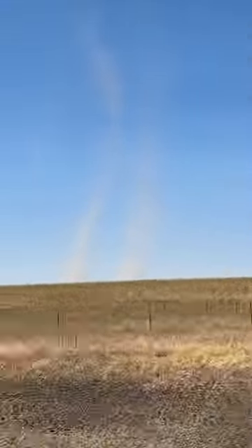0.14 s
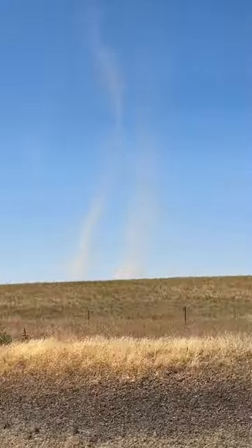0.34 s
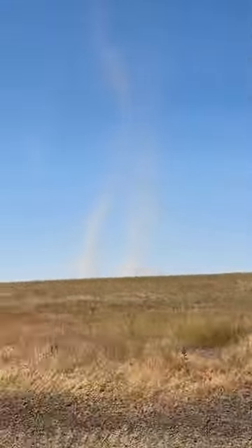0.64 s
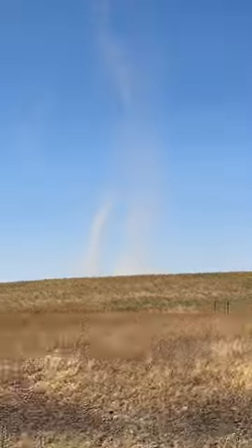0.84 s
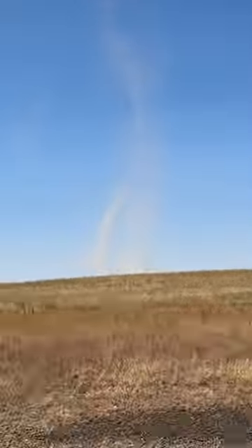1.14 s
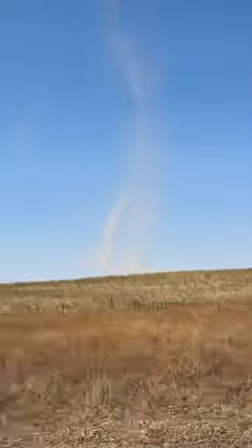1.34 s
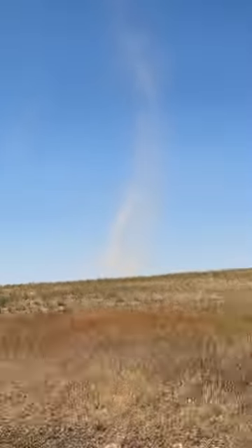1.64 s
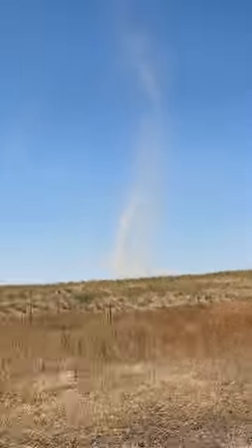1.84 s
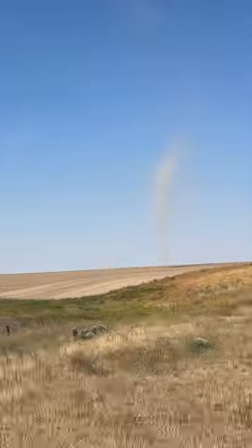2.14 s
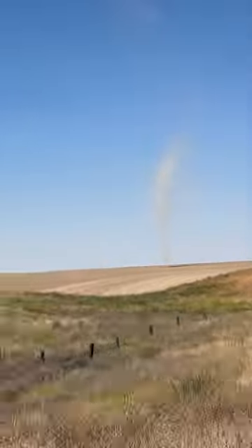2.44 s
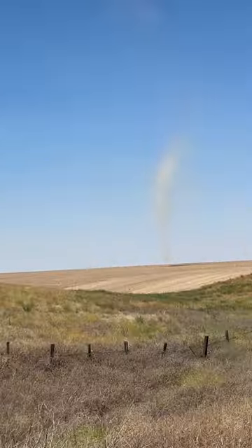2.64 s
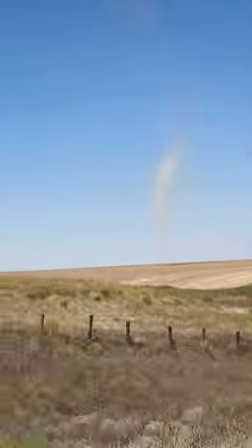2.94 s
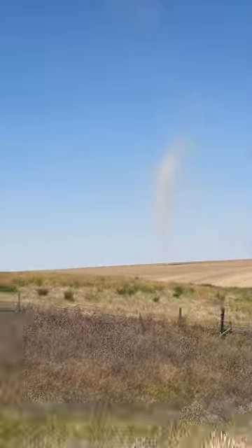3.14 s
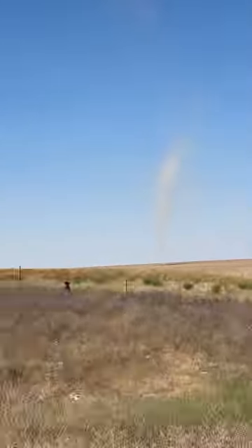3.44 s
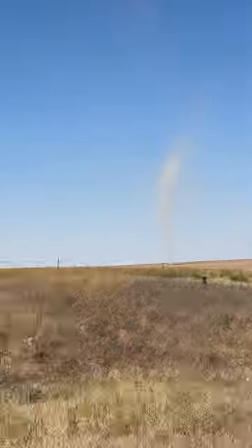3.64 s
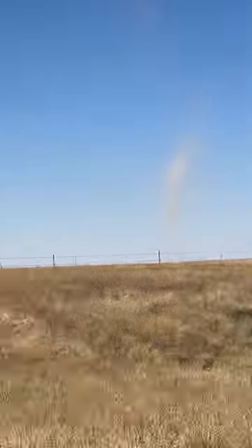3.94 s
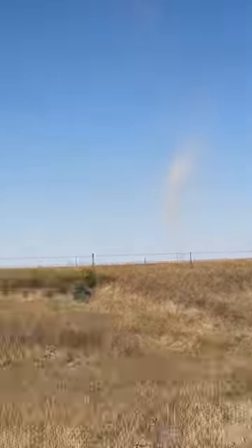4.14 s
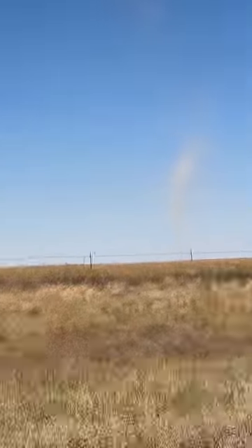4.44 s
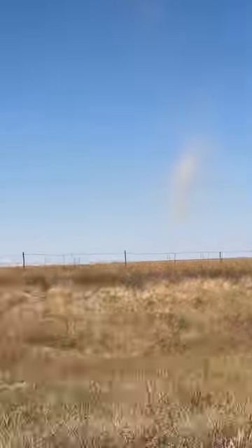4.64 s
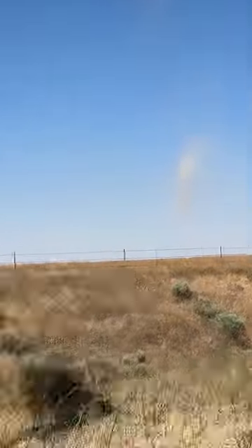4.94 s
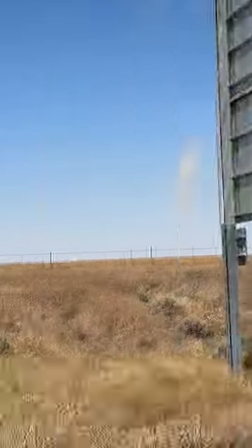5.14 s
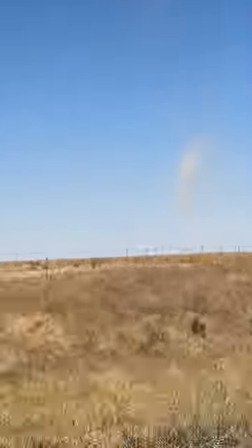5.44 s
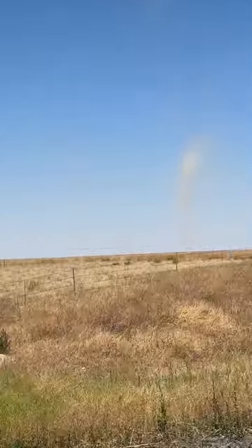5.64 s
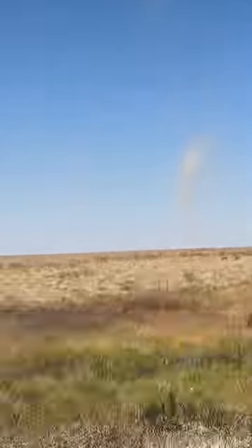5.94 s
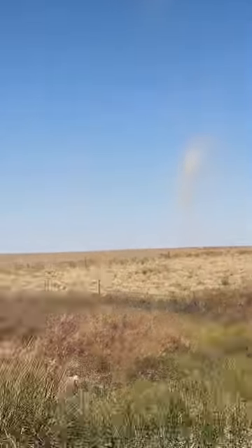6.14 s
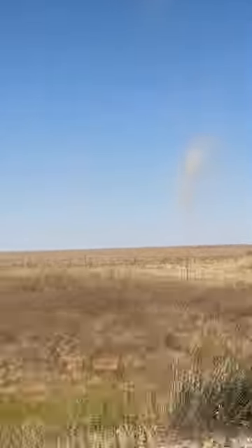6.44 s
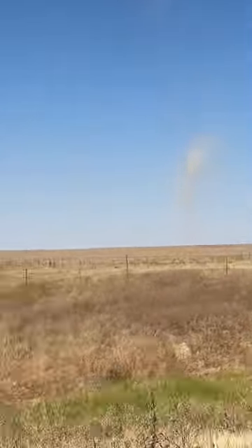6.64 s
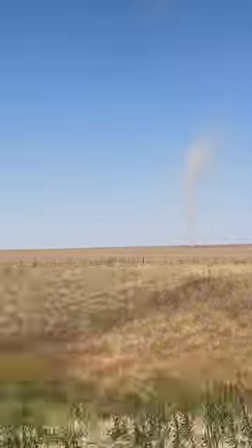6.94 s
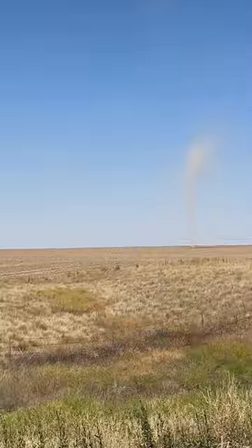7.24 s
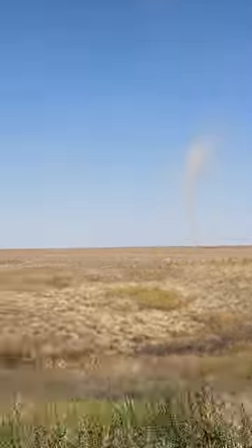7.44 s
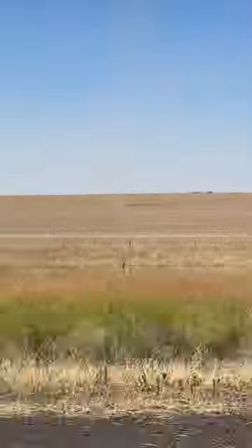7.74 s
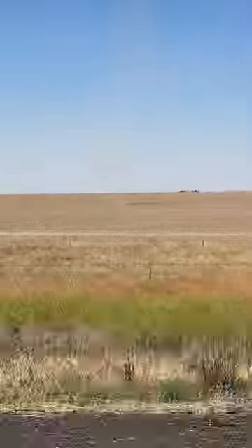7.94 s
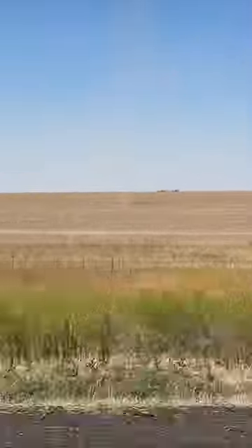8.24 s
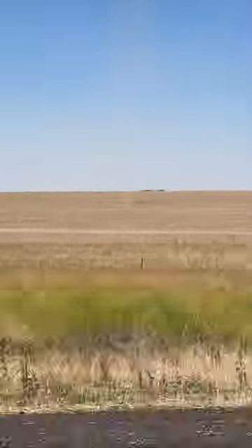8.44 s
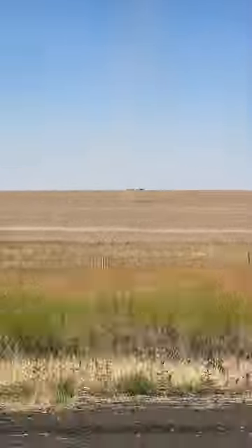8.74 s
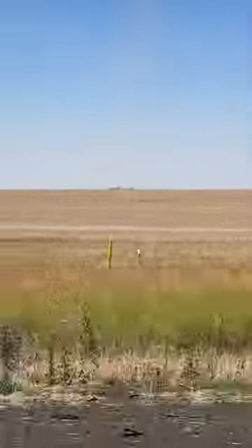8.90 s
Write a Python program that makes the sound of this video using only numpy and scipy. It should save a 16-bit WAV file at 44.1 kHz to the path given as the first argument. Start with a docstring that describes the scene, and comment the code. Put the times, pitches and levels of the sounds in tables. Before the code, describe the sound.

A phone at the open window of a moving car catches heavy wind buffeting in stereo. Deep booms throb around a low cabin tone and tyre rumble, with uneven thuds and small crackles. After two seconds the air rush abruptly becomes brighter and hissier, with thin treble spits; later it cuts back duller, and the hardest crack comes near the end, followed by a brief dip.

```python
"""At the open window of a car on a country road, with a phone held in the draught as microphone.
Road rumble and a wavering cabin tone lie under wind noise that booms in the cabin.
Shaped noise flutters on the microphone; thuds are falling tones, sharp cracks and clicks are jolts.
The filtered-noise rush of air cuts to a brighter, hissing one for some five seconds, then to a duller one.
Thin treble spits stand in the hiss, the first a click at the cut; the level dips after the hardest crack."""
import sys
import numpy as np
from scipy.fft import rfft, irfft, next_fast_len
from scipy.io import wavfile
from scipy.ndimage import uniform_filter1d, map_coordinates

SR = 44100
rng = np.random.default_rng(int(sys.argv[2]) if len(sys.argv) > 2 else 0)


def transcribe(signal):
    """Save signal, clipped to [-1, 1], as a 16-bit WAV file at the path in sys.argv[1]."""
    frames = np.atleast_2d(signal).T
    limited = np.clip(frames, -1, 1)
    pcm = np.round(limited * 32767).astype(np.int16)
    wavfile.write(sys.argv[1], SR, pcm)


N = 399987

# Levels in the tables and settings are relative: most layers add a small trim of their own.
# Spectra give only a shape. Lengths of gusts, flares and lulls are full widths at 1/e of the peak.

# tyre rumble through the body: columns f/Hz, spectral level/dB
ROAD_SPECTRUM = [(15, -51), (30, -14), (55, 8), (110, -15), (220, -9.5), (450, -15.5), (900, -18),
                 (2000, -100.5), (8000, -120)]
# low tone standing in the cabin: columns t/s, mean f/Hz, level/dB
DRONE_COURSE = [(0, 56.1, -30.5), (1.1, 63.04, -22), (2.0, 63.3, -29.5), (2.6, 58.92, -22.5),
                (3.7, 58, -21.5), (4.4, 59.74, -28), (7.2, 57.94, -26), (8.2, 59.92, -20.5),
                (9.0, 59.46, -23)]
# cabin air swinging at the window: columns f/Hz, spectral level/dB
BOOM_SPECTRUM = [(12, -34.5), (22, -26.5), (30, -9), (40, -2), (50, 0.5), (59, 2), (68, -2), (82, -2.5),
                 (110, -14), (160, -25), (400, -66.5), (2000, -120)]
# gusts through the window: columns peak t/s, length/s, cabin boom level/dB, eddy flutter level/dB
WINDOW_GUSTS = [(0.324, .04, -11.5, -27), (0.383, 0.15, -15.5, -34), (0.722, 0.042, -6.5, -30),
                (0.848, 0.14, -16.5, -41), (1.038, .11, -17.5, -24.5), (1.206, 0.12, -12.5, -44),
                (1.382, 0.083, -16, -34), (1.54, 0.03, -13.5, -32), (1.606, 0.035, -7.5, -33),
                (1.813, 0.26, -27, -29), (2.18, 0.04, -8.5, -27), (2.243, 0.04, -7, -28),
                (2.365, 0.045, -7, -29), (2.543, 0.039, -8.5, -27), (2.668, 0.088, -11, -43),
                (2.737, 0.039, -10, -23), (3.014, 0.21, -13, -25), (3.089, 0.082, -13, -16.5),
                (3.306, 0.04, -22.5, -28), (3.381, 0.05, -15.5, -26), (3.522, 0.1, -14.5, -23),
                (3.617, 0.08, -9.5, -19), (3.82, 0.12, -23, -20.5), (3.901, 0.11, -7, -20),
                (4.264, 0.091, -13.5, -43), (4.466, 0.11, -15.5, -42), (4.64, 0.048, -15.5, -19.5),
                (4.743, 0.11, -20, -24), (5.187, 0.088, -11.5, -21), (5.325, 0.25, -26, -26),
                (5.494, 0.1, -13, -23), (5.61, 0.032, -11, -23.5), (5.808, 0.04, -13.5, -35),
                (5.89, 0.07, -15, -30), (5.991, 0.07, -17, -28), (6.14, 0.18, -16.5, -21.5),
                (6.392, 0.39, -16, -24.5), (6.557, 0.06, -7.5, -21), (6.668, .03, -13.5, -24),
                (6.787, .14, -17, -31), (6.916, 0.091, -8, -34), (7.257, 0.28, -15, -27),
                (7.484, 0.19, -21, -40), (7.953, 0.12, -12, -21.5), (8.067, 0.035, -8, -23),
                (8.192, 0.13, -11, -33), (8.509, 0.19, -12, -20.5), (8.94, .15, -8.5, -19)]
# lulls in which the draught lets go of cabin and microphone: columns deepest t/s, length/s, depth/dB
DRAUGHT_LULLS = [(0.14, 0.14, -2), (0.655, 0.067, -7.5), (0.936, 0.054, -5.5), (1.49, 0.054, -8),
                 (2.083, 0.051, -4), (2.32, .03, -6), (2.47, .05, -4), (2.59, .04, -6), (2.823, 0.11, -4.5),
                 (3.204, 0.044, -1.5), (3.436, 0.043, -2), (3.72, 0.052, -0.5), (4.065, 0.12, -4),
                 (4.56, .06, -4), (4.68, .04, -0.5), (4.92, .07, -5), (5.035, 0.042, -4.5),
                 (5.407, .05, -1), (5.66, 0.07, -8.5), (6.262, .05, -5.5), (6.695, .04, -4),
                 (7.057, 0.099, -2), (7.852, 0.054, -6), (8.385, .04, -7), (8.68, .05, -8),
                 (8.796, 0.072, -9.5)]
# small eddies at the microphone: columns f/Hz, spectral level/dB
FLUTTER_SPECTRUM = [(20, -45), (60, -36.5), (120, 3.5), (175, 3.5), (280, -6.5), (430, -11.5), (700, -18.5),
                    (1100, -27.5), (2000, -37.5), (5000, -86.5), (12000, -110)]
# opposite pressure at the two ports: columns f/Hz, spectral level/dB
CROSS_SPECTRUM = [(25, -8), (50, -1), (90, -5.5), (160, 3.5), (250, -2), (400, -4), (700, -12),
                  (1250, -22.5), (1600, -43), (5000, -110)]
# side gusts pushing one port and pulling the other: columns peak t/s, length/s, level/dB
SIDE_GUSTS = [(0.42, 0.21, -42), (0.94, .12, -38), (1.63, 0.18, -39), (1.82, .14, -36), (2.42, 0.35, -41),
              (3.12, 0.066, -37), (3.61, 0.092, -37), (3.93, 0.21, -30), (4.43, 0.073, -34),
              (4.66, .14, -36), (5.19, 0.097, -34), (5.38, 0.17, -44), (5.79, 0.24, -31),
              (6.15, 0.078, -34), (6.73, 0.093, -20.5), (6.96, 0.13, -31), (8.15, 0.1, -29.5),
              (8.44, 0.073, -21.5), (8.56, 0.062, -25), (8.85, 0.23, -34.5)]
# rush of air in its dull, bright and closing stretch: columns t/s, rush level/dB, hiss level/dB
COURSE_DULL = [(0.05, -46, -64.5), (1.63, -44.5, -61.5), (2.1, -44, -65)]
COURSE_BRIGHT = [(2.3, -38.5, -53), (2.43, -37, -55), (3.8, -37, -55), (3.92, -36.5, -56), (4.87, -38, -57),
                 (6.49, -35.5, -52.5), (7.39, -34.5, -51.5), (7.42, -33.5, -52)]
COURSE_CLOSING = [(7.66, -42, -58), (8.08, -41.5, -59), (8.42, -41.5, -58)]
# colour of the rush in each stretch: columns f/Hz, spectral level/dB
COLOUR_DULL = [(100, 2), (350, 2.5), (900, -1.5), (1300, -1.5), (1900, -3.5), (3000, -10.5), (4000, -25),
               (7000, -44), (12000, -69)]
COLOUR_BRIGHT = [(100, 0), (350, 0), (650, -1), (1300, -2), (1900, -4.5), (2600, -11.5), (3500, -21.5),
                 (4600, -29), (7000, -36.5), (12000, -63)]
COLOUR_CLOSING = [(100, -9.5), (350, 2), (650, -5.5), (1350, 1.5), (1900, -5.5), (2600, -13.5),
                  (4000, -28.5), (7000, -41.5), (12000, -72)]
# cuts to a brighter rush of air and to a duller one again: t/s
CUT_TIMES = [2.132, 7.588]
# spells in which the slipstream hisses up: columns peak t/s, length/s, level/dB
HISS_FLARES = [(2.16, 0.04, -59.5), (2.32, 0.28, -49), (2.68, 0.17, -53), (4.86, 0.055, -51),
               (5.2, 0.16, -48), (5.5, 0.12, -50), (6.06, 0.25, -53.5), (6.4, 0.19, -51.5),
               (6.53, 0.13, -46), (6.92, 0.1, -45.5), (7.29, 0.44, -58.5)]
# hollows of cabin and window frame: columns centre f/Hz, width/Hz at half the boost, boost level/dB
FRAME_HOLLOWS = [(348, 60, 4.5), (453.6, 23, 11), (900, 82, 4.5), (1210, 110, 2.5), (1720, 190, 1)]
# finest turbulence: columns f/Hz, spectral level/dB
HISS_SPECTRUM = [(1500, -16.5), (3000, 8), (4700, 1), (4970, -6), (5250, 1.5), (8300, 2), (10500, -6),
                 (12000, -24), (15500, -15.5)]
# eddies hitting the microphone: columns peak t/s, level/dB, nominal f/Hz at the peak, rise/s, t60/s
EDDY_THUDS = [(0.331, -23, 321, 0.0044, 0.042), (0.363, -15, 341, 0.0021, 0.035),
              (0.395, -16, 359, 0.0034, 0.045), (0.641, -19, 331.5, .005, .045),
              (0.744, -26, 423, .012, .06), (0.762, -28, 562, 0.0087, .13),
              (0.832, -26, 600, 0.011, 0.1395), (0.852, -30, 603, 0.0043, 0.039),
              (1.079, -20, 470, .01, .06), (1.422, -23, 308.5, 0.014, 0.122), (1.569, -23, 398, .003, .05),
              (1.6287, -12.5, 349.5, .002, .03), (1.945, -26.5, 448.6, 0.0049, 0.049),
              (2.171, -18, 336, 0.0063, 0.084), (2.221, -23, 379, 0.0024, 0.025),
              (2.741, -16, 237.4, .004, 0.035), (3.081, -15, 414, 0.0086, 0.0976),
              (3.116, -10.5, 290.6, 0.0068, 0.049), (3.497, -18.5, 340, .004, 0.039),
              (3.522, -17.5, 500.4, 0.0082, 0.0476), (3.537, -14, 220.3, 0.0058, 0.0517),
              (3.617, -14.5, 250.7, 0.0081, 0.054), (3.642, -16.5, 435, 0.0086, 0.088),
              (3.662, -18.5, 468, 0.0069, 0.046), (3.681, -19, 448, .003, .03),
              (3.882, -16, 420, .003, .031), (3.925, -11, 219, .008, 0.054),
              (3.941, -16, 398.5, 0.0057, .06), (4.243, -23.5, 450.5, 0.0042, 0.048),
              (4.7538, -14.5, 399, 0.0033, 0.026), (4.948, -17, 242, .01, 0.091),
              (5.469, -12, 270.7, 0.0035, 0.017), (5.567, -17.5, 355, .003, .032),
              (5.604, -15, 327.4, 0.0069, 0.0634), (5.8593, -4.5, 290, 0.0028, 0.0225),
              (5.9115, -9, 180.7, 0.0036, 0.036), (6.152, -13, 179.6, 0.0067, .045),
              (6.402, -16.5, 275.7, 0.0037, 0.034), (6.539, -19, 361, 0.0037, 0.033),
              (6.571, -11, 230.6, 0.011, .06), (6.664, -10, 258, 0.0056, .043),
              (6.737, -11, 419.7, 0.0031, 0.0435), (6.762, -17, 229, .004, .05),
              (7.204, -18.5, 190.3, 0.011, .08), (7.944, -15.5, 396, 0.0043, .038),
              (7.967, -16.5, 280, 0.0035, .036), (8.4525, -6.5, 380, .0025, .032),
              (8.475, -17.5, 240, .01, 0.088), (8.5442, -4.5, 680, 0.0025, 0.0222),
              (8.548, -9, 230.3, 0.0026, 0.043), (8.561, -12.5, 320, 0.0035, .06),
              (8.588, -21.5, 420, .006, .08), (8.918, -15, 280, .012, .08),
              (8.943, -14.5, 518.5, .012, .05), (8.9931, -19, 418.5, .003, .045)]
# puff trailing a thud, at normal speed: columns f/Hz, spectral level/dB
PUFF_SPECTRUM = [(20, -21), (150, 13), (350, -0.5), (750, -9.5), (1300, -31), (3000, -55), (9000, -100)]
# sharp cracks at the port, and clicks, some of them at a cut: columns peak t/s, burst level/dB,
# jolt level/dB, nominal f/Hz (sets the speed), treble snap level/dB
SHARP_CRACKS = [(0.3602, -26, -18, 1250, -54), (0.3886, -27, -25, 1150, -56),
                (0.7606, -23.5, -18, 1446, -40.5), (0.807, -23.5, -24, 940, -59),
                (0.8296, -31, -25, 805, -62), (1.0771, -25, -23, 940, -61),
                (1.0835, -25.5, -20.5, 1230, -53), (1.567, -30, -24, 1400, -55),
                (1.591, -29, -29, 1056, -59), (1.6272, -27, -20, 1370, -45), (1.891, -34, -29, 1140, -62.5),
                (2.1543, -36, -24, 2980, -46.5), (2.2185, -27, -27, 850, -59),
                (3.0749, -19, -16, 1110, -48), (3.080, -22, -22, 797, -59), (3.522, -24.5, -26, 696, -61),
                (3.6155, -26, -15.5, 1190, -49), (3.636, -26, -20, 777, -61), (3.663, -20, -21, 786, -60),
                (3.881, -25, -28, 846, -58), (3.935, -19.5, -16, 900, -64), (4.241, -29, -28, 755, -62),
                (4.7513, -22.5, -19, 900, -60), (5.56, -26, -18, 720, -59), (5.855, -23, -18, 677, -60),
                (6.7356, -22.5, -17, 720, -58), (7.94, -28, -28, 790, -57), (7.966, -26.5, -23, 1210, -56),
                (8.4553, -23.5, -12, 1430, -42), (8.4586, -28.5, -21, 1900, -45.5),
                (8.541, -25, -19, 2000, -31), (8.544, -17, -7.5, 2130, -18.5),
                (8.5577, -38, -24, 2400, -42), (8.5613, -26, -17, 1900, -38.5),
                (8.9273, -24.5, -20, 1220, -57), (8.9386, -21, -16, 1210, -53),
                (8.9455, -29, -25, 1700, -50), (8.9485, -21, -20, 1156, -55)]
# burst of a crack, at normal speed: columns f/Hz, spectral level/dB
BURST_SPECTRUM = [(40, -25), (250, 6.5), (700, 7.5), (1400, -5.5), (2200, -14.5), (3200, -17.5),
                  (4200, -34), (6000, -43), (9000, -54.5), (14000, -84)]
# treble snap of a crack or click: columns f/Hz, spectral level/dB
SNAP_SPECTRUM = [(1000, -10), (2600, 4), (4200, 0), (4970, -11.5), (5600, 3), (7000, -1.5), (9500, -4),
                 (11500, -19), (15500, -26.5)]
# thin spits in the hiss, the first a click at the cut: columns t/s (1.8 ms ahead of the peak), level/dB
TREBLE_SPITS = [(2.134, -38), (2.7476, -41.5), (3.003, -38), (3.0734, -39.5), (3.7274, -40.5), (5.177, -38),
                (5.2046, -36), (5.474, -35), (5.5174, -30.5), (6.004, -41.5), (6.219, -39.5),
                (6.334, -30.5), (6.5869, -36), (6.909, -34.5), (7.2385, -26.5), (7.3364, -34)]
# colour of the spits: columns f/Hz, spectral level/dB
SPIT_SPECTRUM = [(2000, -5), (6000, -9), (10500, 1), (12500, -21), (15500, -10)]
# stereo width of all air noise, before a layer's own offset: columns f/Hz, side minus mid level/dB
STEREO_WIDTH = [(30, -47.5), (170, -20.5), (600, -12.5), (1200, -8.5), (1700, -53), (4400, -48),
                (4970, 10.5), (5500, -45), (8000, -16.5), (9500, 2.5), (11000, 13.5), (15000, 15.5)]

# time around the peak of a thud, crack or spit (s)
AROUND = np.arange(-SR // 25, SR // 8) / SR
# cabin boom between gusts (dB), its random sway (dB) and the pace of the sway (knots per s)
BOOM_DB, BOOM_SWAY_DB, SWAY_RATE = -23, 4, 17
# flutter between gusts (dB) at the reference rush (dB), its growth (dB per dB of rush), its sway (dB)
FLUTTER_DB, REFERENCE_RUSH_DB, FLUTTER_GROWS, FLUTTER_SWAY_DB = -30, -40, 0.99, 1.2
# share of a lull's depth that the flutter follows
LULL_FLUTTER_SHARE = 0.5
# steady crosswind (dB), its sway (dB), and its added part relative to the flutter level (dB)
CROSS_DB, CROSS_SWAY_DB, CROSS_SHARE_DB = -51, 4, -20.5
# how much higher a flare's level is in the rush than in the hiss (dB)
FLARE_RUSH_DB = 9.5
# share of a thud's t60 that scales the time of its fall in pitch
SINK_SHARE = 0.1985
# nominal pitches at which the puff and the crack run at normal speed (Hz)
THUD_HZ, CRACK_HZ = 350, 1200
# rough air around a crack: level relative to the burst column (dB), and the most it reaches (dB)
SKIRT_DB, SKIRT_TOP_DB = -5, -32.5
# dip after the hardest crack: bottom reached (s), hold (s), recovery (s), depth (dB)
DIP_S, DIP_HOLD_S, DIP_RELEASE_S, DIP_DB = 8.585, 0.1, 0.089, -11
# band limit of the phone (Hz)
TOP_HZ = 15830


def amp(db):
    """Decibels to gain."""
    return 10 ** (np.asarray(db) / 20)


def unit(x):
    """x at rms 1."""
    return x / np.sqrt(np.mean(x ** 2) + 1e-20)


def along(points, hz):
    """(Hz, value) points read on a log axis."""
    f, v = np.transpose(points)
    return np.interp(np.log(hz + 1), np.log(f + 1), v)


def curves(rows):
    """One value per sample for each column after the time."""
    s, *cols = np.transpose(rows)
    return [np.interp(np.arange(N) / SR, s, c) for c in cols]


def wobble(rate):
    """A smooth random curve, rate knots a second."""
    knots = rng.standard_normal(int(N * rate / SR) + 4)
    return map_coordinates(knots, [np.arange(N) * rate / SR])


def filtered(x, response):
    """x times a response of frequency."""
    m = next_fast_len(N + SR // 2)
    spectrum = rfft(x, m) * response(np.fft.rfftfreq(m, 1 / SR))
    return irfft(spectrum, m)[..., :N]


def air_noise(spectrum, side_db):
    """Left and right noise of joint rms 1: alike in the bass, apart near 5 kHz and in the top treble."""
    def mid_and_side(hz):
        mid_db = along(spectrum, hz)
        return amp([mid_db, mid_db + along(STEREO_WIDTH, hz) + side_db])

    mid, side = filtered(rng.standard_normal((2, N)), mid_and_side)
    return unit(np.array([mid + side, mid - side]))


def steadied(x, span):
    """x with its strength held even over stretches longer than span seconds."""
    size = max(int(span * SR), 2)
    power = uniform_filter1d(np.mean(x ** 2, axis=0), size)
    power = uniform_filter1d(power, size)
    return x / np.sqrt(np.abs(power) + 1e-6)


def surges(rows):
    """Power of bell-shaped surges, one per (peak s, length s, dB) row."""
    t, power = np.arange(N) / SR, np.zeros(N)
    for s, length, db in rows:
        near = np.abs(t - s) < 2 * length
        power[near] += amp(db) ** 2 * np.exp(-2 * (2 * (t[near] - s) / length) ** 2)
    return power


def topped(bed_db, power):
    """Level in dB of a steady bed with a power curve on top."""
    return 10 * np.log10(amp(bed_db) ** 2 + power)


def swell(t, rise, t60):
    """A rounded rise to the peak at t = 0, then an even decay in dB."""
    return np.where(t < 0, np.exp(-(t / rise) ** 2), amp(-60 * np.abs(t) / t60))


def add(track, s, sound):
    """Mix a sound, timed by AROUND, into the track at s seconds."""
    start = round((s + AROUND[0]) * SR)
    track[..., start:][..., :len(AROUND)] += sound


def sped(noise, speed):
    """A random piece of the noise, timed by AROUND and played at the given speed."""
    place = rng.uniform(SR, N - SR) + AROUND * speed * SR
    return np.array([map_coordinates(channel, [place], order=1) for channel in noise])


def dip():
    """A brief dip in dB: a fast drop, a hold and an even recovery."""
    corners = DIP_S + np.array([-.02, 0, DIP_HOLD_S, DIP_HOLD_S + DIP_RELEASE_S])
    return np.interp(np.arange(N) / SR, corners, [0, DIP_DB, DIP_DB, 0])


def stretches():
    """Weights of the dull, bright and closing stretch, with quick cross-fades at the cuts."""
    stretch = np.searchsorted(CUT_TIMES, np.arange(N) / SR)
    return [uniform_filter1d((stretch == k) * 1., size=400) for k in range(len(CUT_TIMES) + 1)]


def slipstream():
    """Levels of rush and hiss in dB: each stretch has its own course, and every flare lifts both."""
    courses = (COURSE_DULL, COURSE_BRIGHT, COURSE_CLOSING)
    rush_db, hiss_db = sum(weight * np.array(curves(air)) for weight, air in zip(stretches(), courses))
    flare = surges(HISS_FLARES)
    return topped(rush_db, flare * amp(FLARE_RUSH_DB) ** 2), topped(hiss_db, flare)


def lulls():
    """Drop in dB as the draught lets go: one smooth hollow for each lull."""
    t = np.arange(N) / SR
    return sum(db * np.exp(-np.minimum((2 * (t - s) / length) ** 2, 20))
               for s, length, db in DRAUGHT_LULLS)


def buffeting(rush_db, lull_db):
    """Levels of boom and flutter in dB: gusts on swaying beds, less in lulls; fast air flutters more."""
    boom_gusts = surges([(s, length, boom_db) for s, length, boom_db, _ in WINDOW_GUSTS])
    flutter_gusts = surges([(s, length, flutter_db) for s, length, _, flutter_db in WINDOW_GUSTS])
    boom_bed_db = BOOM_DB + BOOM_SWAY_DB * wobble(SWAY_RATE) + dip() / 2
    growth_db = FLUTTER_GROWS * (rush_db - REFERENCE_RUSH_DB)
    flutter_bed_db = FLUTTER_DB + growth_db + FLUTTER_SWAY_DB * wobble(16) + dip()
    boom_db = topped(boom_bed_db, boom_gusts) + lull_db
    flutter_db = topped(flutter_bed_db, flutter_gusts) + LULL_FLUTTER_SHARE * lull_db
    return boom_db, flutter_db


def road():
    """Tyres drone steadily through the body: low shaped noise."""
    return amp(-35.5) * air_noise(ROAD_SPECTRUM, side_db=-12.0)


def drone():
    """A low tone stands in the cabin, wavering a little in pitch and strength."""
    hz, level_db = curves(DRONE_COURSE)
    cycles = np.cumsum(hz * (1 + 0.0261 * wobble(7))) / SR
    tone = np.sin(2 * np.pi * (rng.random() + cycles))
    return amp(level_db + 2.36 * wobble(7.6) + dip()) * unit(tone)


def cabin_boom(boom_db):
    """The air in the cabin swings against the open window at an uneven pitch: narrow low noise."""
    return amp(boom_db + 0.5) * steadied(air_noise(BOOM_SPECTRUM, side_db=-12.0), span=0.055)


def flutter(flutter_db):
    """Small eddies roll over the microphone in quick lumps."""
    lumps = amp(3.8 * wobble(45) + 1.6 * wobble(170))
    noise = lumps * air_noise(FLUTTER_SPECTRUM, side_db=-8.5)
    return amp(flutter_db) * steadied(noise, span=0.066)


def crosswind(flutter_db):
    """Eddies between the two ports drive them oppositely, growing with the flutter and in side gusts."""
    bed_db = CROSS_DB + CROSS_SWAY_DB * wobble(9) + dip()
    level_db = topped(bed_db, amp(flutter_db + CROSS_SHARE_DB) ** 2 + surges(SIDE_GUSTS))
    lumps = amp(5.8 * wobble(35) + 2.2 * wobble(140))
    push = steadied(lumps * air_noise(CROSS_SPECTRUM, side_db=-7.0), span=0.053)[0]
    return amp(level_db + 0.2) * np.array([push, -push])


def rush(rush_db):
    """Air tears along the window frame and sounds the hollows; the colour switches at each cut."""
    spectra = (COLOUR_DULL, COLOUR_BRIGHT, COLOUR_CLOSING)
    colours = [air_noise(spectrum, side_db=-7.0) for spectrum in spectra]
    flow = sum(weight * colour for weight, colour in zip(stretches(), colours))

    def hollows(hz):
        return amp(sum(db / (1 + (2 * (hz - centre) / width) ** 2)
                       for centre, width, db in FRAME_HOLLOWS))

    grain = unit(amp(1.22 * wobble(25) + 0.76 * wobble(300)))
    return amp(rush_db + 4.5) * grain * unit(filtered(flow, hollows))


def hiss(hiss_db, boom):
    """The finest turbulence pulses with each swing of the cabin air."""
    swing = steadied(boom, span=.15).mean(axis=0)
    pulse = unit(amp(0.88 * swing + 1.47 * wobble(60) + 0.84 * wobble(9.9)))
    return amp(hiss_db + 4.0) * pulse * air_noise(HISS_SPECTRUM, side_db=-3.5)


def thuds(sinking, rough):
    """Big eddies shake the diaphragm for a few uneven cycles of falling pitch and trail a puff."""
    out = np.zeros((2, N + SR))
    wake = steadied(air_noise(PUFF_SPECTRUM, side_db=-1.0), span=0.0071)
    for s, db, hz, rise, t60 in EDDY_THUDS:
        jitter = map_coordinates(rng.standard_normal(200), [(AROUND - AROUND[0]) * 800])
        fall = sinking * np.tanh(AROUND / (SINK_SHARE * t60))
        pitch = hz * np.exp(-fall + rough * jitter - rough ** 2)
        phase = 2 * np.pi * (rng.random() + np.cumsum(pitch) / SR)
        add(out, s, amp(db + 2.0) * swell(AROUND, rise, t60) * np.sin(phase))
        puff = sped(wake, (hz / THUD_HZ) ** .8)
        add(out, s, amp(db - 1.5) * swell(AROUND, rise, t60 * 1.8) * puff)
    return out[:, :N]


def kink(t, width):
    """One sharp up-and-down jolt of pressure at t = 0, of peak 1, with a smooth spectrum."""
    u = t / width
    jolt = -u / (1 + u ** 2) ** 2
    return jolt / jolt.max()


def cracks():
    """Cracks and clicks: a noise burst, a jolt with a weaker one ahead, a treble snap and rough air."""
    out = np.zeros((2, N + SR))
    noise = steadied(air_noise(BURST_SPECTRUM, side_db=-8), span=0.0011)
    fizz = air_noise(SNAP_SPECTRUM, side_db=-2)
    leads = rng.uniform(0.000975, 0.00306, len(SHARP_CRACKS))
    for (s, db, jolt_db, hz, snap_db), lead in zip(SHARP_CRACKS, leads):
        # a faster one is higher and shorter
        speed = hz / CRACK_HZ
        t = AROUND * speed
        add(out, s, amp(db + 1.5) * swell(t, rise=0.0022, t60=0.019) * sped(noise, speed))
        skirt = swell(AROUND, rise=0.005, t60=0.055) * sped(noise, min(speed, 1))
        add(out, s, amp(min(db + SKIRT_DB, SKIRT_TOP_DB)) * skirt)
        jolts = kink(t, width=0.00023) + amp(-11) * kink(t + lead, width=0.00024)
        add(out, s, amp(jolt_db) * jolts)
        add(out, s, amp(snap_db) * swell(AROUND, rise=0.0012, t60=0.0054) * sped(fizz, 0.99))
    return out[:, :N]


def spits():
    """Thin spits in the top treble, the first a click at the cut: short swells of one noise."""
    envelope = np.zeros(N + SR)
    for s, db in TREBLE_SPITS:
        add(envelope, s + 0.0018, amp(db + 3) * swell(AROUND, rise=0.0012, t60=0.029))
    return envelope[:N] * air_noise(SPIT_SPECTRUM, side_db=-3.5)


def scene():
    """Road, buffeting, rush of air, thuds, cracks and spits together at the phone in the draught."""
    rush_db, hiss_db = slipstream()
    lull_db = lulls()
    boom_db, flutter_db = buffeting(rush_db, lull_db)
    boom = cabin_boom(boom_db)
    cabin = road() + amp(lull_db) * drone() + boom
    wind = flutter(flutter_db) + crosswind(flutter_db)
    air = amp(dip()) * (rush(rush_db) + hiss(hiss_db, boom))
    short_sounds = thuds(sinking=.45, rough=0.328) + cracks() + spits()
    return cabin + wind + air + short_sounds


def record(dry):
    """The phone rounds off the highest peaks and keeps nothing above its band limit."""
    rounded = dry / (1 + np.abs(dry / .95) ** 8) ** (1 / 8)
    return filtered(rounded, lambda hz: hz < TOP_HZ)


dry = scene()
out = record(dry)
transcribe(out)
```